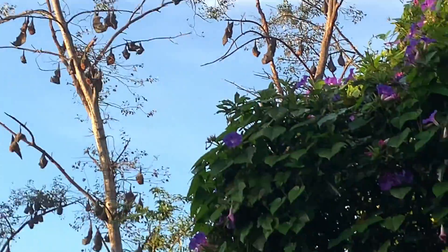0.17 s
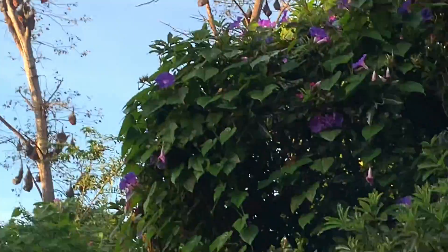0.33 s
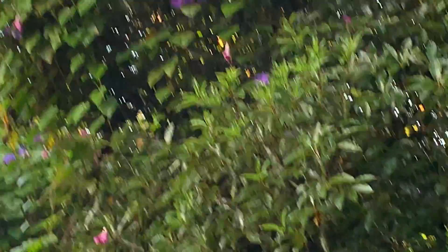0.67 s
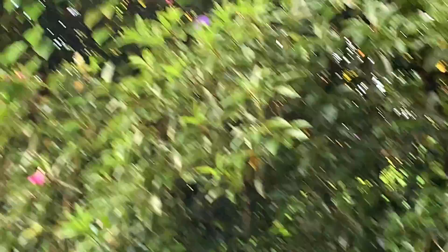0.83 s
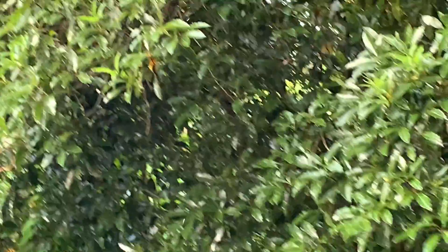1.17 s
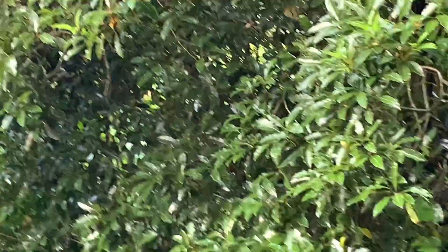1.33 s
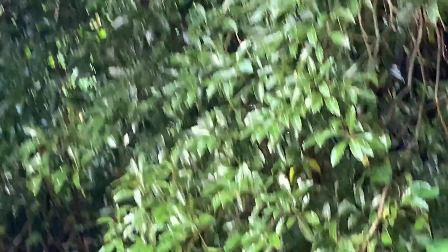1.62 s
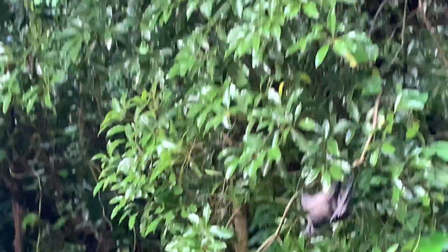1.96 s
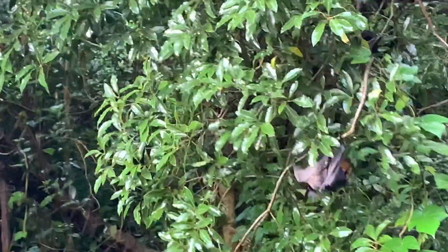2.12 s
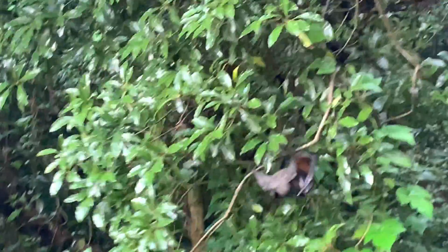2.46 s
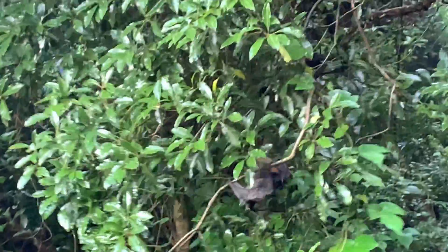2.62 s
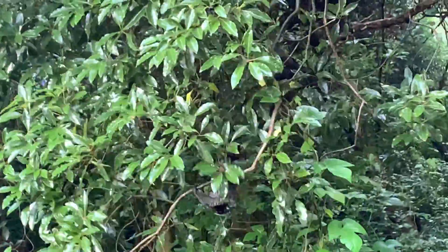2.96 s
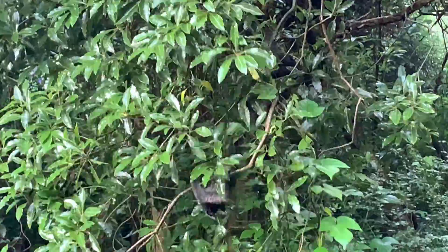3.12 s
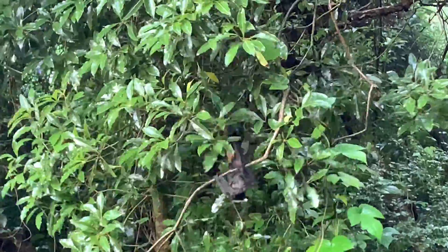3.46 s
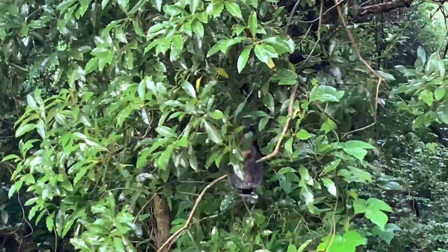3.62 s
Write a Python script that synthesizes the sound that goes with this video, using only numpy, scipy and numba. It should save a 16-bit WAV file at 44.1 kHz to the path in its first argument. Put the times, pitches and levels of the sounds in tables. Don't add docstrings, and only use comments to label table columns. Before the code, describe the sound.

Bat colony chatters continuously outdoors, swelling after one second with close rasps, squeals, hisses and a young bat's scream, then sinking and rising again with quick high chirps; distant birds and low traffic, handheld stereo phone.

```python
import sys
import numpy as np
from scipy import signal
from scipy.fft import rfft, irfft, next_fast_len
from scipy.io import wavfile
from scipy.ndimage import uniform_filter1d
from numba import njit

SR = 44100
rng = np.random.default_rng(int(sys.argv[2]) if len(sys.argv) > 2 else 0)


def voltage_ratio(level):
    return 10 ** (np.asarray(level, float) / 20)


def put_to_file(sound):
    columns = np.atleast_2d(sound).T
    safe = np.clip(columns, -1, 1)
    whole_steps = np.round(safe * 32767)
    wavfile.write(sys.argv[1], SR, whole_steps.astype(np.int16))


N = 167139
CHANCE = rng.standard_normal(2 * N)
NEAR_SPREAD = .12

# [t/s, level/dB]
EXCITEMENT = [(0, -33), (.15, -36), (.25, -37), (.5, -32.5), (.66, -37.5), (.75, -36), (1.05, -31.5),
              (1.3, -29), (1.5, -30), (1.8, -31.5), (2.05, -28.5), (2.3, -32), (2.45, -33), (2.55, -34),
              (2.8, -33.5), (3.1, -30), (3.35, -33.5), (3.79, -32)]


def col(table, k, x):
    a = np.array(table, float)
    return np.interp(x, a[:, 0], a[:, k])


def level(x, db):
    return x * voltage_ratio(db) / np.sqrt(np.mean(x ** 2) + 1e-18)


def noise(count):
    i = rng.integers(N)
    return CHANCE[i:i + count]


def walk(rate, count):
    k = max(int(SR / rate), 1)
    steps = np.repeat(noise(count // k + 1), k)
    smooth = uniform_filter1d(uniform_filter1d(steps, k), k)
    return 1.269 * smooth[:count]


@njit
def svf(x, hz, width):
    y, b, l = np.empty(len(x)), 0., 0.
    g, k = np.tan(np.pi * hz / SR), width / hz
    for i in range(len(x)):
        v = (b + g * (x[i] - l)) / (1 + g * (g + k))
        b, l, y[i] = 2 * v - b, l + 2 * g * v, k * v
    return y


def band(x, hz, width, times=2):
    for _ in range(times):
        x = svf(x, float(hz), float(width))
    return x


def shape(count, edge_s):
    t = np.arange(count) / SR
    to_edge = np.minimum(t, (count / SR - t) / 1.5)
    return np.sin(np.pi / 2 * np.clip(to_edge / edge_s, 0, 1)) ** 2


def voice(hz, tones, rough, grain=.25, waver=0.01834):
    rough = np.clip(rough, 0, 1)
    wavering_hz = hz * (1 + waver * rough * walk(140, len(hz)))
    phase = 2 * np.pi * np.cumsum(wavering_hz) / SR + 2 * np.pi * rng.random()
    burst = (1 - rough) + rough * walk(grain * hz.mean(), len(hz))
    y = sum(voltage_ratio(db) * np.sin(k * phase) * (k * hz.max() < .45 * SR) for k, db in tones)
    return level(y * burst, 0)


def add(out, x, start_s, spread=1):
    side = spread * rng.uniform(-1, 1)
    for c, s in enumerate((side, -side)):
        i = max(int(start_s * SR) + int(9 * s), 0)
        out[c, i:i + len(x)] += voltage_ratio(2 * s) * x[:max(N - i, 0)]


def calls(out, rows, tones, rough, gain_db=0, edge_s=0.0063, grain=.25, spread=NEAR_SPREAD):
    for start_s, length_s, from_hz, to_hz, db in rows:
        n = int(length_s * SR)
        call = voice(np.linspace(from_hz, to_hz, n), tones, rough, grain)
        add(out, voltage_ratio(db + gain_db) * shape(n, edge_s) * call, start_s, spread)


def throat_calls(out, rows, throat):
    pulse_hz, pulse_jitter, breath = 225, 0.23, 3.6
    treble_hz, treble_width_hz = 9500, 10000
    for start_s, length_s, db, throat_hz, treble_db in rows:
        n = int(length_s * SR)
        phase = np.cumsum(pulse_hz * np.exp(pulse_jitter * walk(190, n))) / SR % 1
        pulses = np.exp(-phase / 0.052)
        drive = noise(n) * (breath + 0.43 * pulses) * voltage_ratio(2.0 * walk(48, n))
        y = voltage_ratio(treble_db) * level(band(drive, treble_hz, treble_width_hz), 0)
        for multiple, width_hz, ring_db in throat:
            y = y + voltage_ratio(ring_db) * level(band(drive, multiple * throat_hz, width_hz), 0)
        add(out, voltage_ratio(db) * shape(n, .03) * y, start_s)


def air(t):
    # [f/Hz, level per Hz/dB]
    spectrum = [(100, -4), (250, -7), (600, -10), (800, -17.5), (1300, -8), (2200, -8), (7000, -8.5),
                (15500, -29)]
    flicker_db, follows, alike_hz = 2, 0.66, 620
    swell_db = col(EXCITEMENT, 1, t) - np.mean(col(EXCITEMENT, 1, t))
    edges_hz, bands_db = np.array(spectrum, float).T
    out = 0
    for hz in 110 * 2 ** np.arange(0, 7.2, 1 / 3):
        mid, side = (band(rng.standard_normal(N), hz, hz / 3) for _ in range(2))
        db = np.interp(np.log(hz), np.log(edges_hz), bands_db) + flicker_db * walk(8.1, N)
        db = db + follows * swell_db * min(hz / 1000, 1)
        apart = min(hz / alike_hz, 1) ** 0.91 * side * np.array([[1], [-1]])
        out = out + voltage_ratio(db) * (mid + apart)
    return level(out, -39.5)


def rumble(t):
    # [t/s, level/dB]
    engines = [
        (0, -51.5),
        (1.4, -51.5),
        (1.6, -49.5),
        (3.79, -48),
    ]
    mid, side = (level(band(rng.standard_normal(N), 59.5, 49, times=3), 0) for _ in range(2))
    return voltage_ratio(col(engines, 1, t)) * (mid + voltage_ratio(-17.0) * side * np.array([[1], [-1]]))


def coos(out):
    # [start t/s, length t/s, level/dB, pitch f/Hz]
    coo_rows = [(.36, .2, -61, 590), (.89, .33, -58, 590), (.91, .07, -57, 500), (1.42, .12, -60, 520),
                (1.48, .3, -59, 600), (1.65, .14, -60, 490), (1.86, .18, -56, 530), (2.06, .08, -57, 510),
                (2.07, .18, -59, 590), (2.58, .22, -61, 600), (3.12, .16, -59, 590), (3.52, .1, -60, 530)]
    glides = [(s, d, .98 * f, 1.02 * f, db) for s, d, db, f in coo_rows]
    calls(out, glides, [(1, 0), (2, -12)], .42, 2.5, edge_s=.025, grain=.15)


def caws(out):
    # [start t/s, length t/s, from f/Hz, to f/Hz, level/dB]
    caw_rows = [(.175, .09, 1140, 1100, -49), (.27, .07, 1100, 1100, -52), (.68, .1, 1140, 1100, -50),
                (.78, .12, 1110, 1080, -50), (1.21, .05, 820, 810, -52), (1.22, .06, 1200, 1130, -52),
                (1.29, .08, 1090, 1180, -50), (1.42, .04, 1010, 990, -47), (1.78, .08, 1090, 1180, -53),
                (1.94, .08, 860, 850, -53), (1.86, .12, 1300, 1270, -53), (2.02, .05, 1390, 1370, -50),
                (2.19, .1, 1030, 1160, -53), (2.27, .1, 1050, 1120, -52), (2.3, .11, 900, 930, -53),
                (2.4, .13, 1060, 1060, -54), (2.72, .05, 1170, 1130, -53), (3.09, .12, 1070, 1110, -53),
                (3.2, .1, 1160, 1140, -51), (3.19, .09, 960, 970, -55), (3.3, .15, 1080, 1020, -51),
                (3.7, .07, 1140, 1150, -53)]
    calls(out, caw_rows, [(1, 0), (2, -14)], .46, -1.5, edge_s=.012, grain=.2, spread=1)


def crowd():
    # [multiple of pitch, level/dB]
    crowd_tones = [(1, 0), (1.35, -7), (2, -11), (3, -22), (4.3, -27)]
    squeal_s, pitch_hz, pitch_spread, rise = .07, 3080, .17, .04
    scatter_db, deep_db = 2, -11
    out = np.zeros((2, N))
    rows = np.clip(rng.standard_normal((800, 6)), -2, 2)
    for i, (when, pitch, size, glide, long, deep) in enumerate(rows):
        n = int(SR * squeal_s * np.exp(0.399 * long))
        low = deep > .7
        hz = pitch_hz * np.exp(pitch_spread * pitch) * (.66 if low else 1)
        hz = hz * (1 + rise * (.5 + glide) * np.linspace(-.5, .5, n))
        squeal = np.hanning(n) * voice(hz, crowd_tones, .85, grain=.2)
        start_s = (i + when) / len(rows) * N / SR - squeal_s / 2
        add(out, voltage_ratio(scatter_db * size + deep_db * low) * squeal, start_s)
    return out


def hoarse_bat(out):
    # [start t/s, length t/s, level/dB, throat f/Hz, treble level/dB]
    hoarse_rows = [
        (0, 0.21, -46.5, 3120, -3.5),
        (0.359, 0.12, -44, 3100, -9),
        (0.46, 0.17, -45.5, 3110, -10),
        (.58, .13, -40, 3160, -9),
        (0.851, 0.1, -45.5, 3100, -19),
        (0.929, 0.23, -46, 2990, -22),
    ]
    # [multiple of throat f, width f/Hz, level/dB]
    hoarse_throat = [(.75, 503, -3.5), (1, 620, 6.5), (1.45, 815, -0.5), (2.07, 900, 4.5)]
    throat_calls(out, hoarse_rows, hoarse_throat)


def hisses(out):
    # [start t/s, length t/s, level/dB, throat f/Hz, treble level/dB]
    hiss_rows = [
        (1.499, 0.44, -48, 3070, -5),
        (1.751, 0.22, -45, 3340, 2.5),
        (2.268, 0.26, -44, 3200, -23),
        (2.519, 0.17, -41, 3190, -4),
        (2.644, .17, -42, 3200, -6),
        (3.05, 0.394, -51.5, 3110, 3),
        (3.421, 0.53, -50.5, 3010, -24),
    ]
    # [multiple of throat f, width f/Hz, level/dB]
    hiss_throat = [(.6, 1140, -1.5), (1, 1300, -7), (1.45, 960, -1), (2.05, 1900, 3.5), (4.7, 2500, -12)]
    throat_calls(out, hiss_rows, hiss_throat)


def high_calls(out):
    # [start t/s, length t/s, from f/Hz, to f/Hz, level/dB]
    high_rows = [
        (1.61, .1, 6150, 6200, -40),
        (3.09, .15, 10900, 12900, -51),
        (3.2, .3, 12600, 12700, -50),
        (.3, .2, 3200, 3250, -38),
        (3.4, .25, 4800, 4850, -47),
        (3.16, .35, 15000, 14900, -56),
        (3.22, .25, 4800, 4800, -47),
        (2.3, .16, 8300, 8200, -49),
    ]
    calls(out, high_rows, [(1, 0)], 1, -2, grain=.12)


def chirps(out):
    # [peak t/s, peak level/dB]
    chirp_rows = [
        (3.2571, -30),
        (3.3075, -30),
        (3.3623, -31.5),
        (3.4147, -32),
    ]
    # [multiple of pitch, level/dB]
    chirp_tones = [(1 / 3, -4), (1, 0)]
    length_s, from_hz, to_hz = .022, 13800, 16000
    sweeps = [(s - length_s / 3, length_s, from_hz, to_hz, db - 5) for s, db in chirp_rows]
    calls(out, sweeps, chirp_tones, 0.69, edge_s=0.0061, grain=0.0505)


def scream(out):
    # [t/s, pitch f/Hz, level/dB, roughness 0-1]
    path = [
        (1.645, 3580, -46, .3),
        (1.665, 3620, -31, .22),
        (1.71, 3670, -31, .3),
        (1.735, 3780, -33, .65),
        (1.8, 3900, -32, .85),
        (1.87, 4000, -33, 1),
        (1.94, 4050, -48, 1),
    ]
    # [multiple of pitch, level/dB]
    scream_tones = [(1, 0), (2, 0), (3, -9), (4, -18)]
    t = np.arange(path[0][0], path[-1][0], 1 / SR)
    cry = voice(col(path, 1, t), scream_tones, col(path, 3, t), grain=.15, waver=.045)
    add(out, voltage_ratio(col(path, 2, t)) * cry, t[0], NEAR_SPREAD)


def squeals(out):
    # [start t/s, length t/s, from f/Hz, to f/Hz, level/dB]
    squeal_rows = [(.44, .14, 1900, 1850, -53), (.5, .16, 2450, 2500, -48), (.75, .1, 1700, 1800, -53),
                   (.84, .2, 1680, 1770, -51), (.1, .06, 3250, 3200, -41), (.53, .1, 3100, 3200, -43),
                   (1.09, .07, 2850, 3400, -36), (1.15, .08, 3300, 3250, -39),
                   (1.245, .05, 3200, 3350, -33), (1.3, .045, 3400, 3000, -36),
                   (1.37, .04, 4550, 4560, -38), (1.37, .04, 4050, 4050, -39), (1.37, .04, 3030, 3030, -39),
                   (1.545, .035, 5300, 5300, -43), (1.555, .018, 3200, 3200, -34),
                   (1.41, .08, 1650, 1750, -52), (1.29, .07, 4350, 4300, -42), (2.39, .07, 5000, 4750, -41),
                   (1.6, .055, 3300, 3100, -35), (2.32, .13, 1600, 1550, -52), (3.62, .05, 3700, 3650, -43),
                   (1.12, .16, 1950, 2000, -52), (1.29, .08, 1550, 1400, -48), (1.53, .13, 1900, 1800, -49),
                   (1.85, .23, 1600, 1750, -51), (1.9, .16, 2100, 2100, -49), (2.5, .07, 1360, 1350, -50),
                   (2.66, .08, 2000, 1830, -48), (2.52, .14, 4700, 4750, -47), (2.55, .06, 6500, 6550, -47),
                   (2.74, .08, 4050, 4000, -46)]
    # [multiple of pitch, level/dB]
    squeal_tones = [(1, 0), (2, -28)]
    calls(out, squeal_rows, squeal_tones, .42, 2, grain=0.0823)


def rasps(out):
    # [start t/s, length t/s, level/dB, throat f/Hz, treble level/dB]
    rasp_rows = [(1.074, 0.21, -31, 3620, -13), (1.238, 0.13, -28.5, 3440, -6.5),
                 (1.418, 0.091, -36, 2920, -37), (1.586, 0.084, -36.5, 3140, -4.5),
                 (1.862, 0.17, -33.5, 3220, -43), (1.978, 0.11, -33.5, 2700, -26),
                 (2.268, 0.15, -42, 2940, -3.5), (2.342, 0.16, -39, 2640, 0.5),
                 (2.95, 0.63, -46.5, 3230, -17.5), (3.449, 0.25, -44, 3430, -30),
                 (3.72, 0.13, -49, 3370, -4)]
    # [multiple of throat f, width f/Hz, level/dB]
    rasp_throat = [(.5, 1100, -10), (1, 800, 0), (1.24, 1300, -2), (2.1, 2400, -12)]
    throat_calls(out, rasp_rows, rasp_throat)


def single_calls():
    out = np.zeros((2, N))
    for caller in (coos, caws, hoarse_bat, hisses, high_calls, chirps, scream, squeals, rasps):
        caller(out)
    return out


def trees(x, wet_db):
    t = np.arange(int(.4 * SR)) / SR
    fade = np.exp(-np.log(1000) * t / .3)
    tail = rng.standard_normal((2, len(t))) * fade * (t > .004)
    tail /= np.sqrt(np.sum(tail ** 2, axis=1, keepdims=True))
    echoes = signal.fftconvolve(x.mean(axis=0, keepdims=True), tail, axes=1)[:, :N]
    return x + voltage_ratio(wet_db) * echoes


def scene():
    t = np.arange(N) / SR
    din = level(trees(crowd(), 5), -1) * voltage_ratio(col(EXCITEMENT, 1, t))
    return air(t) + rumble(t) + din + trees(single_calls(), -5)


def low_pass(x):
    return signal.sosfilt(signal.butter(12, 17070, fs=SR, output="sos"), x)


def record(dry):
    join_hz, join_width_hz, opposed_hz, turn_hz = 7300, 600, 8600, 2400
    bass_cut_hz, top_hz = 36, 15850
    n = next_fast_len(N)
    left, right = rfft(dry, n)
    hz = np.arange(len(left)) * SR / n
    joined = np.clip((hz - join_hz) / join_width_hz + .5, 0, 1)
    lagged = left * np.exp(1j * np.pi * (1 + (hz - opposed_hz) / turn_hz))
    right = np.sqrt(1 - joined) * right + np.sqrt(joined) * lagged
    passed = (hz < top_hz) / np.sqrt(1 + (bass_cut_hz / (hz + 1)) ** 8)
    mix = irfft(np.array([left, right]) * passed, n)[:, :N]
    return low_pass(mix)


dry = scene()
out = record(dry)
put_to_file(out)
```